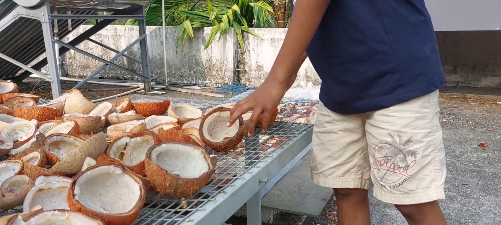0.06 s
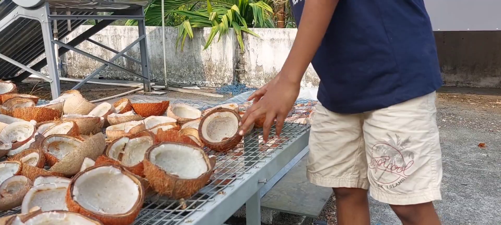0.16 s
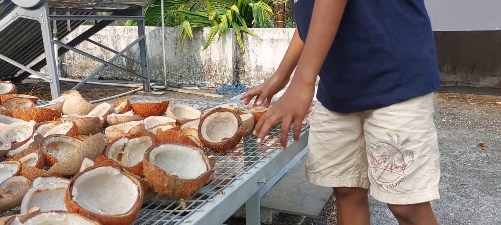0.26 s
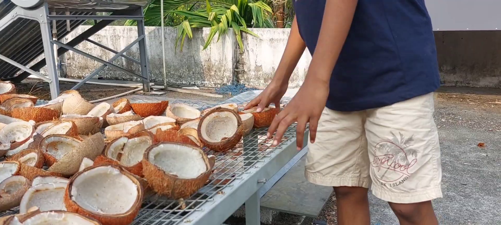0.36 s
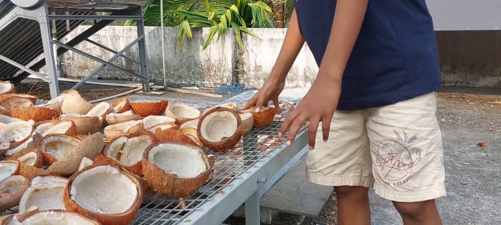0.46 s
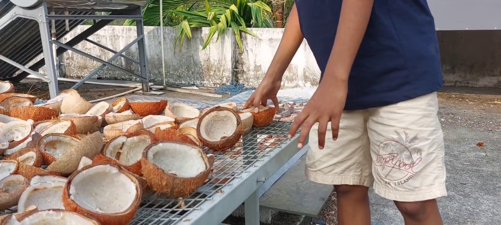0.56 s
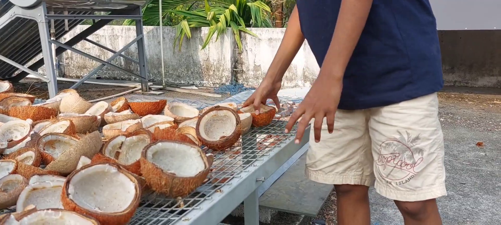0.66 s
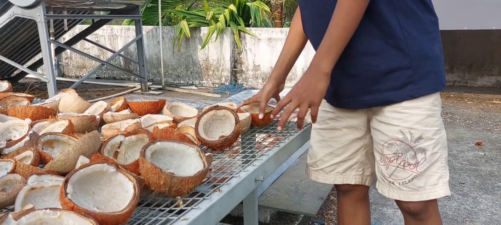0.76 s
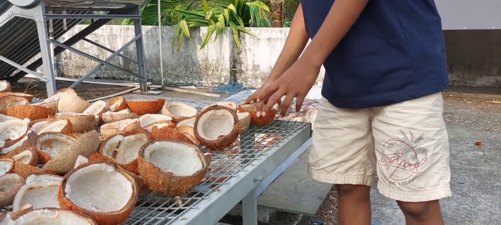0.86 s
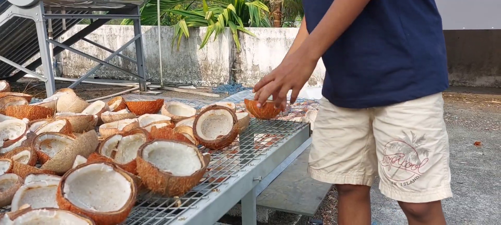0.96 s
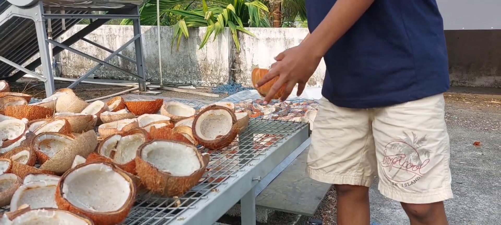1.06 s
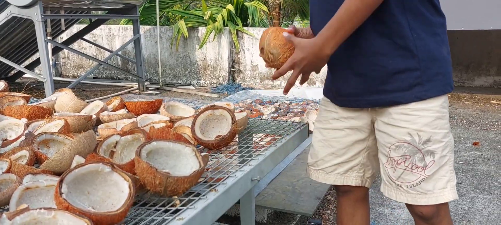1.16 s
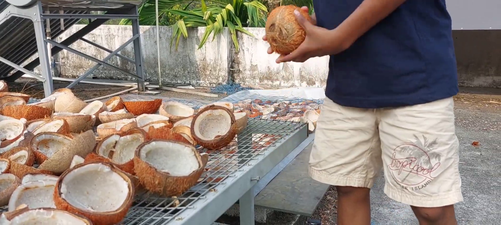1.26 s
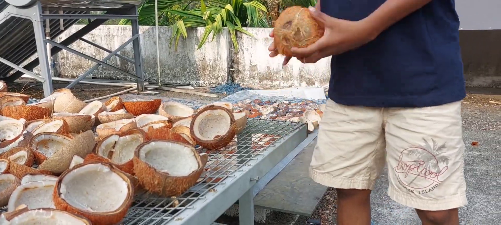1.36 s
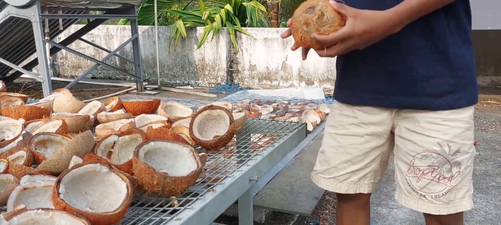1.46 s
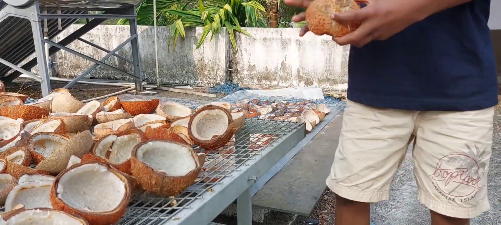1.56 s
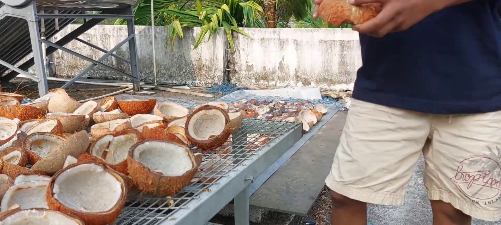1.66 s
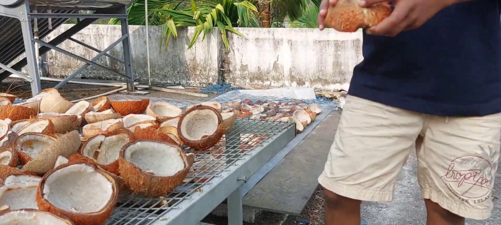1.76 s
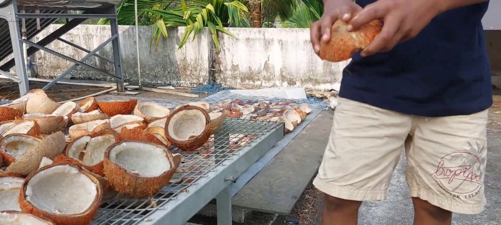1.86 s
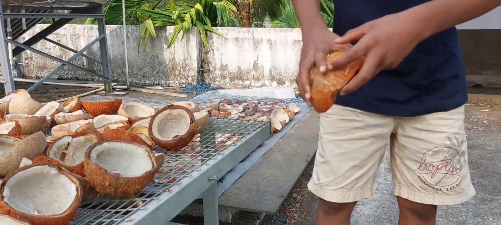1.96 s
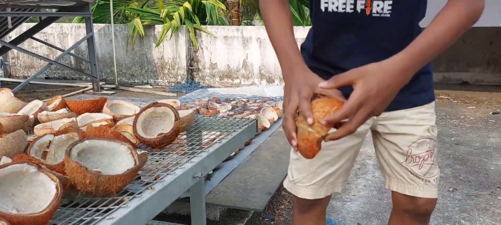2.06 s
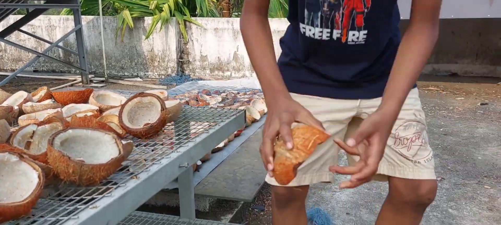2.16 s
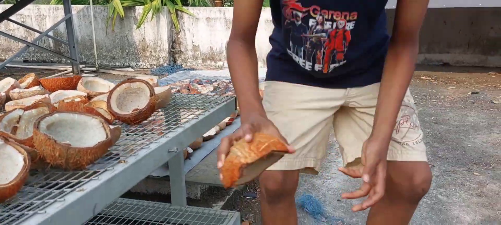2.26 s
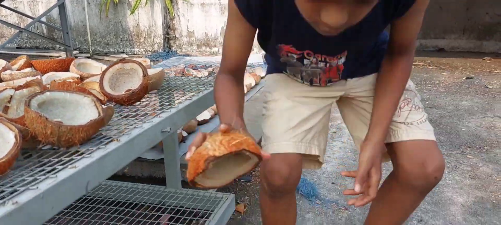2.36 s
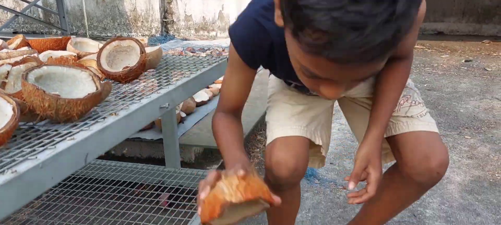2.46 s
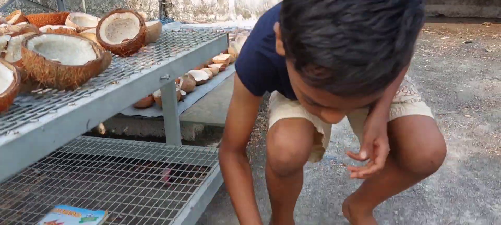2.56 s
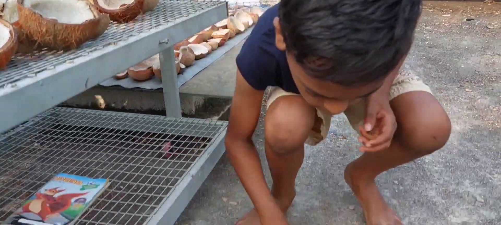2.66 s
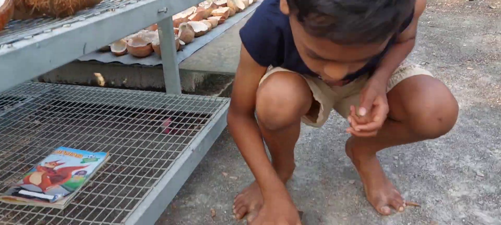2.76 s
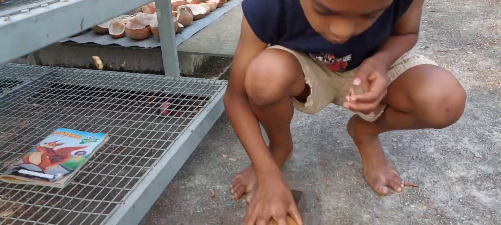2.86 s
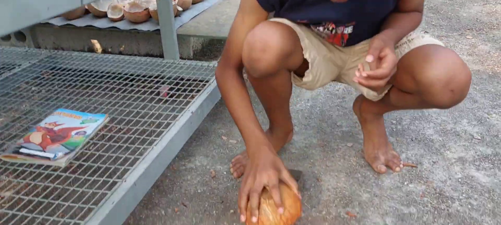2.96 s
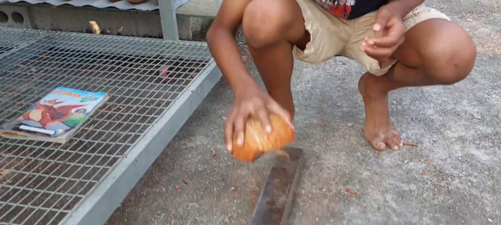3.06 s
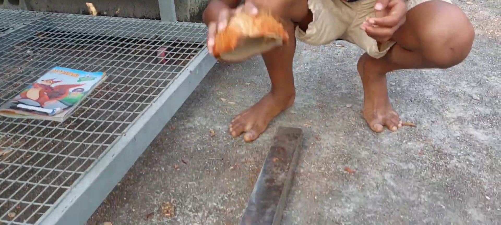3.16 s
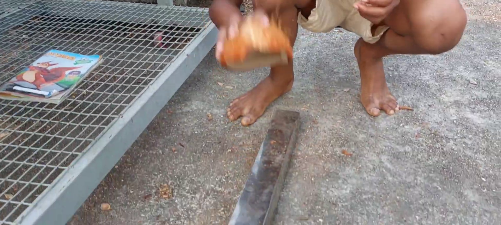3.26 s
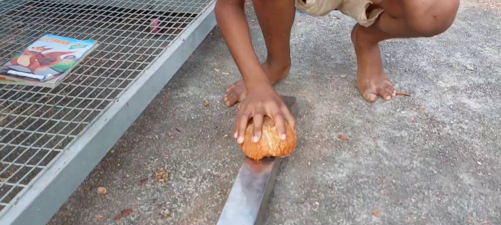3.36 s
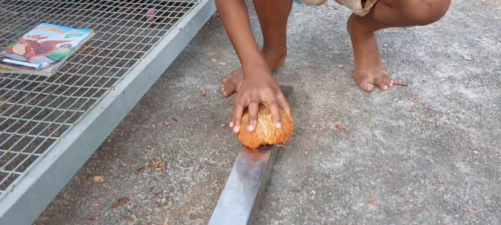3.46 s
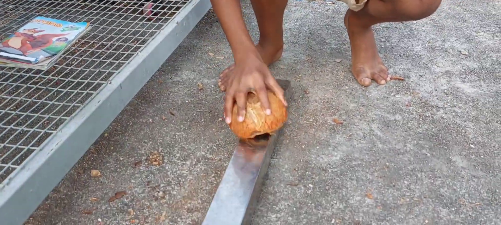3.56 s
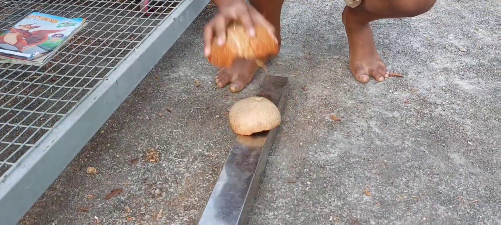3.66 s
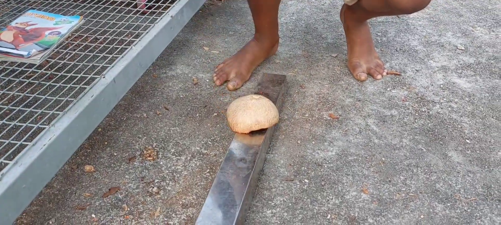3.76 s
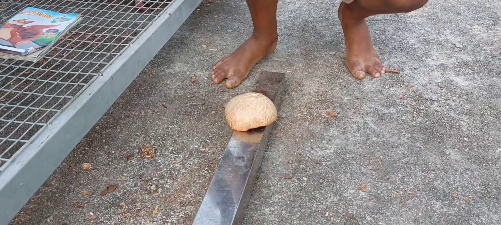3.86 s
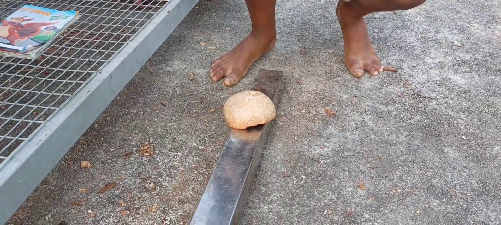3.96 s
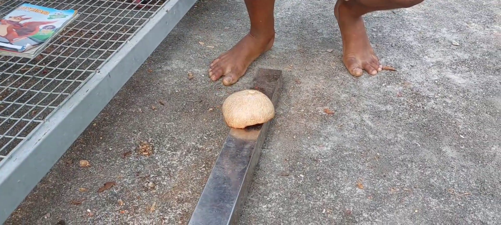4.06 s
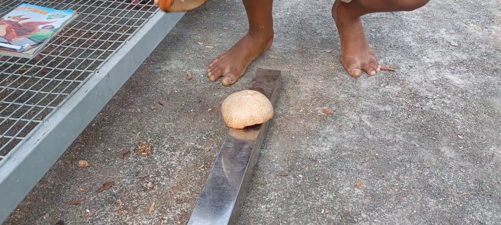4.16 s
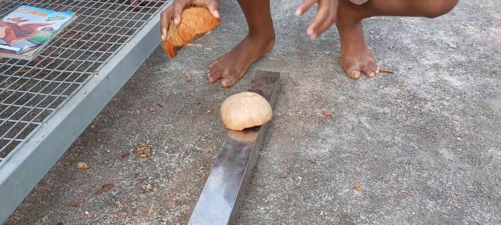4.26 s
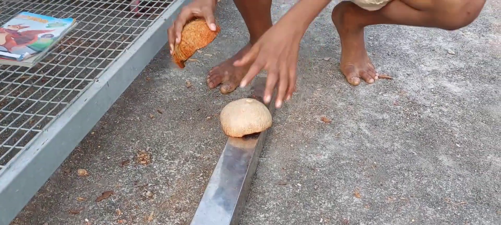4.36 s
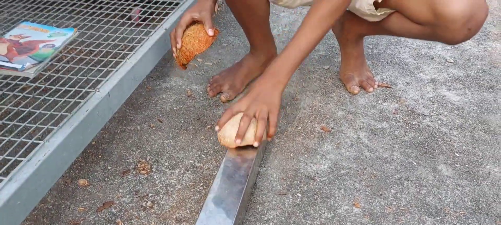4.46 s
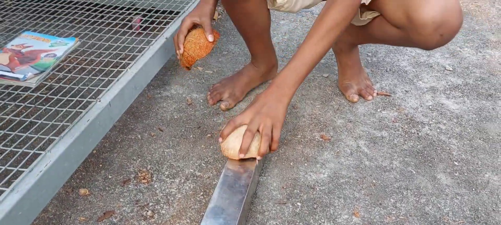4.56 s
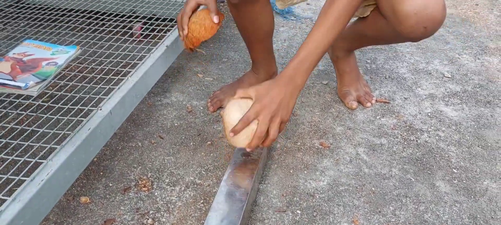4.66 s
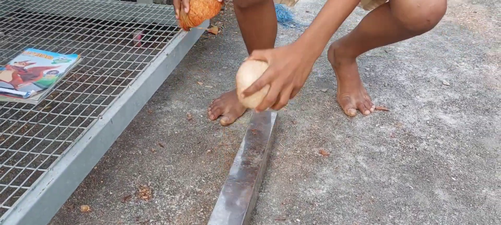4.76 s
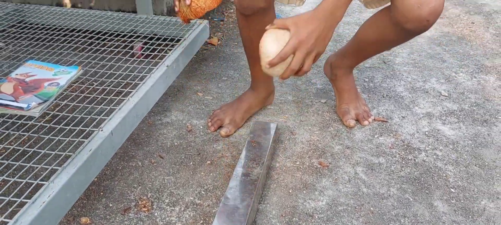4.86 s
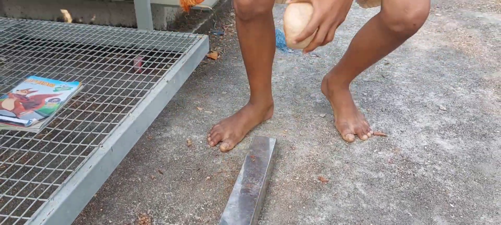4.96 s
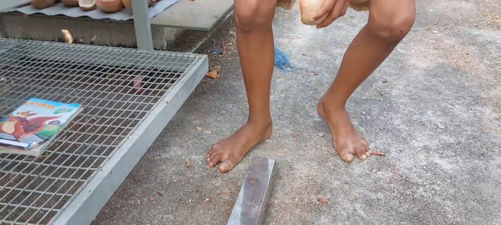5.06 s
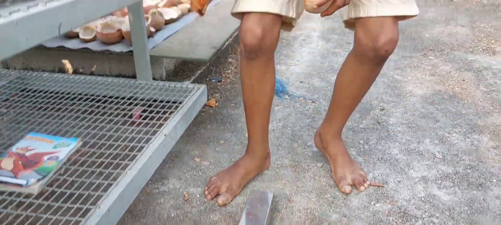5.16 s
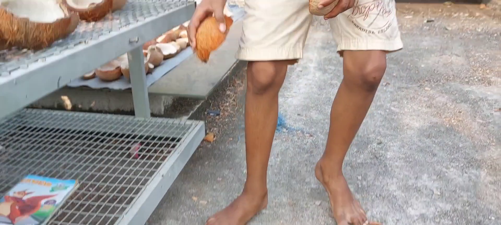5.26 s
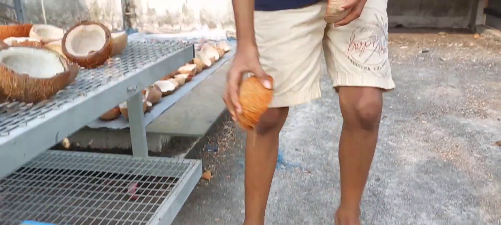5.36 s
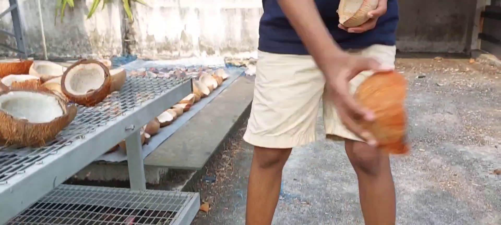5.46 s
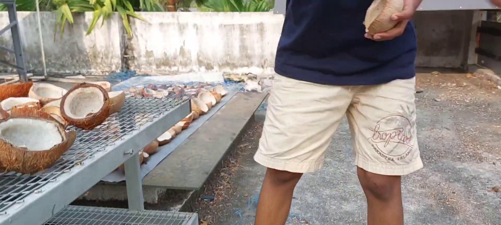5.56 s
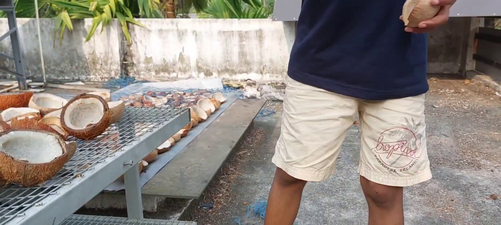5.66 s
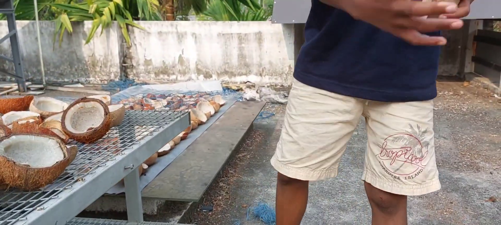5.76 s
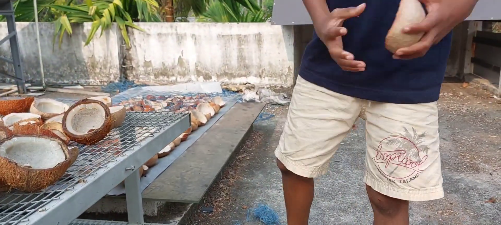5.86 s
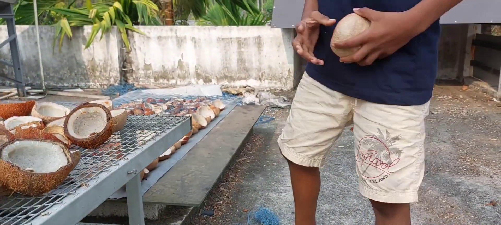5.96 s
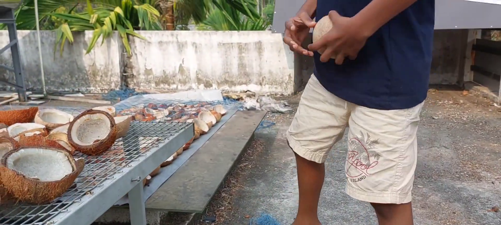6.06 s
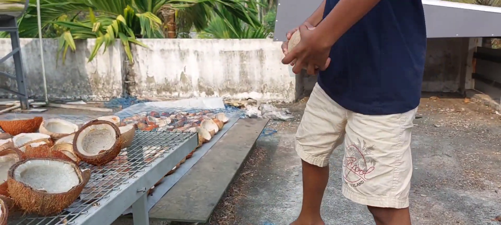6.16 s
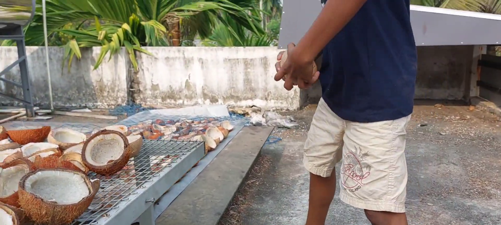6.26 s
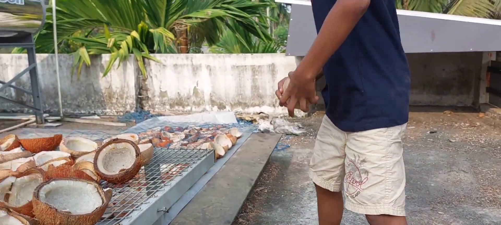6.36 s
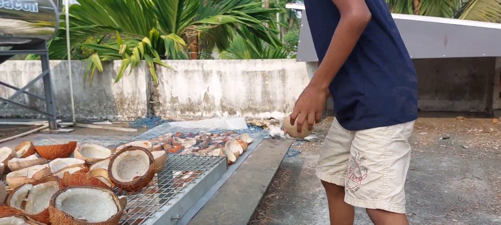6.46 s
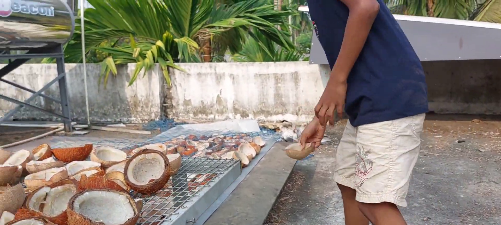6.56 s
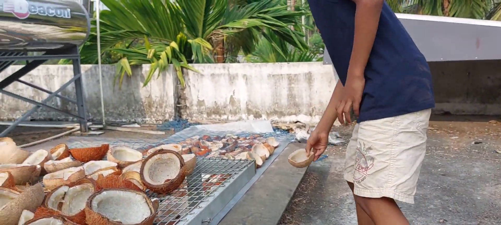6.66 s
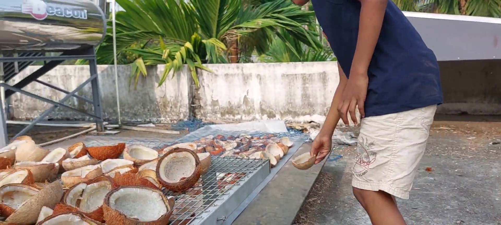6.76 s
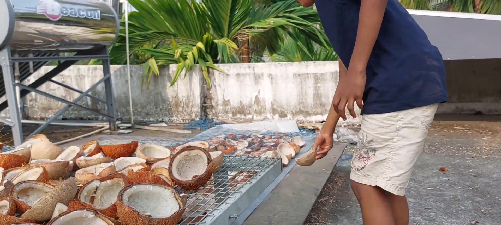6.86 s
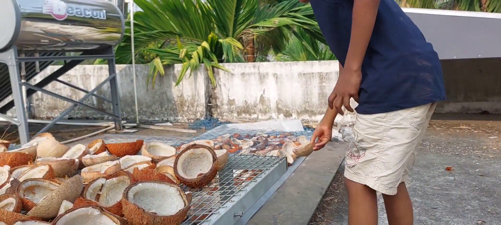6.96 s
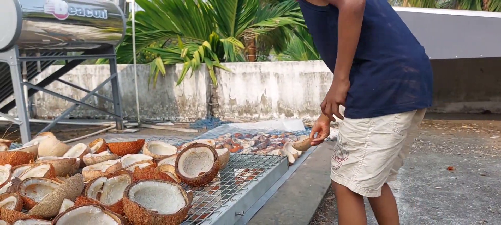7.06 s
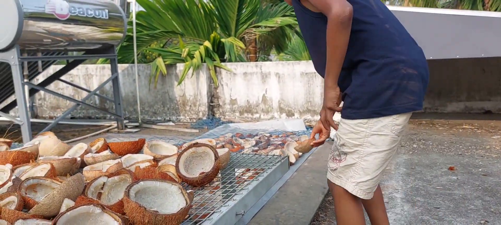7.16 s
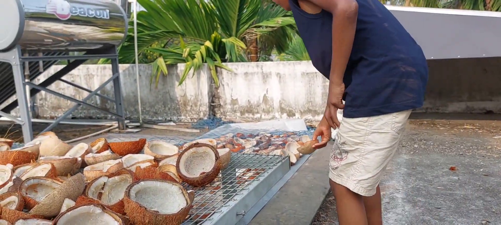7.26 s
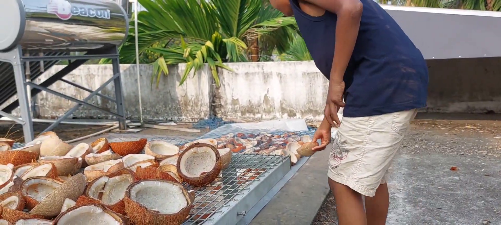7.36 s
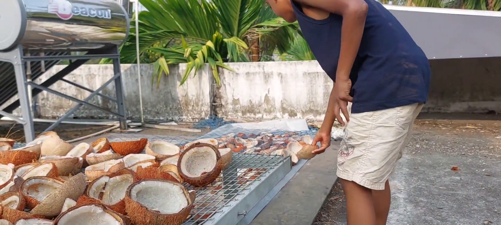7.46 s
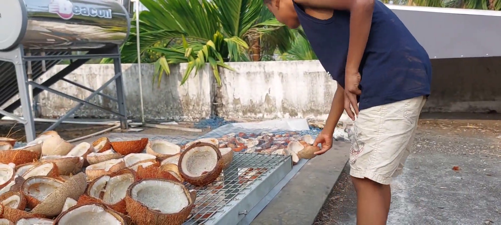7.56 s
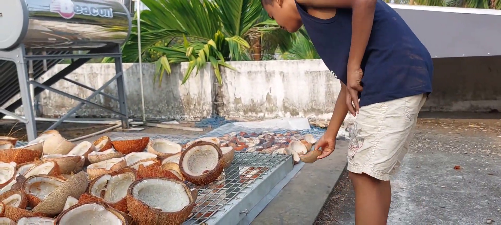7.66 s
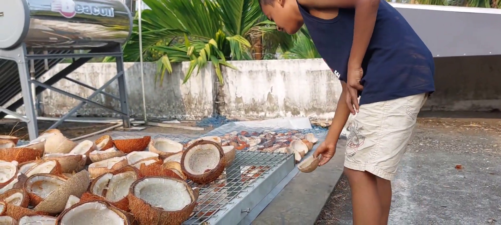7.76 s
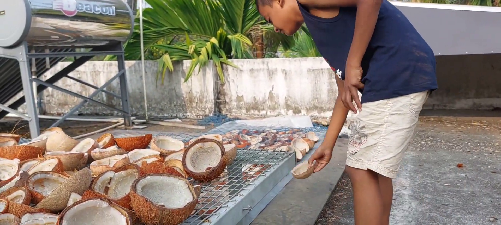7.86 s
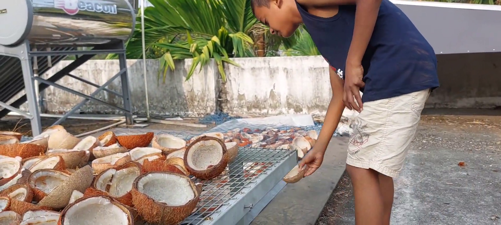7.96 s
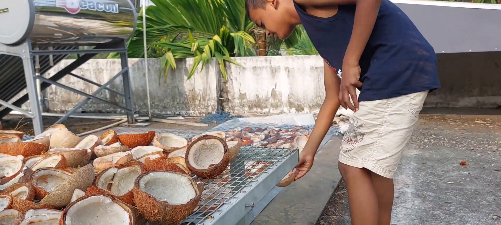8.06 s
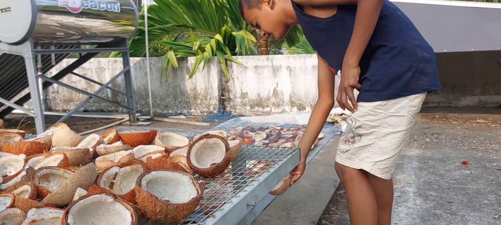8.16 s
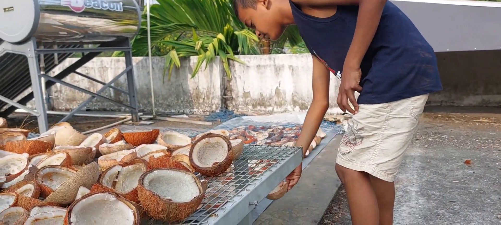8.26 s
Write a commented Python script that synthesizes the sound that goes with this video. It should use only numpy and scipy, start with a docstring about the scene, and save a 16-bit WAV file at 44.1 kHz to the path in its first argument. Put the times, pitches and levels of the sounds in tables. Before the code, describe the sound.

In an open yard with faint crows and a bird whistle, a coconut half smashes twice on steel, then its hollow shell knocks to rest.

```python
"""A low outdoor rumble, a soft hiss, a far rasp and crows open the scene; a bird whistles, whines drift by.
A coconut half is slammed twice on a steel blade on concrete: noise crunches, thuds and rattles over dying sines.
The loosened shell cracks down on the concrete and bounces to rest, its hollow modes ringing; brief dry scrapes
of rubbed husk and sliding shell, rasps and air are shaped noise, caws are harmonics, whistles gliding tones.
A gain control ducks everything at the slams, so the background sinks and then creeps back."""
import sys
import numpy as np
from scipy import signal
from scipy.fft import rfft, irfft, next_fast_len
from scipy.io import wavfile
from scipy.ndimage import uniform_filter1d, minimum_filter1d

SR = 44100
rng = np.random.default_rng(int(sys.argv[2]) if len(sys.argv) > 2 else 0)


def to_wav(s):
    """Save 16-bit WAV."""
    ch = np.atleast_2d(s).T  # columns
    pcm = np.round(np.clip(ch, -1, 1) * 32767)  # PCM
    wavfile.write(sys.argv[1], SR, pcm.astype(np.int16))


N = 366894
TIME = np.arange(N) / SR

# low outdoor rumble, also the colour of the slams' boom: [f/Hz, relative level per Hz/dB]
RUMBLE_COLOUR = [(15, -50), (25, -16), (67, 1.5), (87, 0), (147, -0.5), (184, -9), (267, -6), (310, -13),
                 (479, -20), (835, -24.5), (900, -30), (1170, -49), (1980, -120)]
# broadband crack of shell and grit: [f/Hz, relative level per Hz/dB]
CRUNCH_COLOUR = [(60, -11), (300, 0.5), (800, 3.5), (1800, 6), (4000, -2.5), (7000, -1.5), (10500, -7.5),
                 (15000, -9.5)]


def from_db(db):
    """Decibels to amplitude gain."""
    return 10 ** (np.asarray(db) / 20)


def rms_one(x):
    """Scale to unit power."""
    return x / np.sqrt(np.mean(x ** 2) + 1e-20)


def at_hz(points, hz, axis=1):
    """Read a column of a spectrum on a log-frequency axis."""
    table = np.array(points)
    return np.interp(np.log(hz + 1e-9), np.log(table[:, 0]), table[:, axis])


def add(out, s, sound):
    """Mix a sound in from time s on."""
    start = max(round(s * SR), 0)
    out[..., start:start + sound.shape[-1]] += sound[..., :N - start]


def low_pass(x, hz, order=2):
    """Causal Butterworth low-pass."""
    return signal.sosfilt(signal.butter(order, min(hz, SR / 2 - 1), fs=SR, output="sos"), x)


def noise(colour, size=N, alike=0.):
    """Stereo noise of unit power with a given spectrum and left-right likeness."""
    length = next_fast_len(size)
    hz = np.fft.rfftfreq(length, 1 / SR)
    if callable(colour):
        gain = colour(hz)
    else:
        # tabled colours also roll off below 30 Hz
        gain = from_db(at_hz(colour, hz)) * hz ** 2 / (hz ** 2 + 30 ** 2)
    white = rng.standard_normal((2, length))
    mid, side = irfft(rfft(white) * gain, length)[:, :size]
    alike = np.clip(alike, -1, 1)
    return rms_one(np.sqrt(1 + alike) * mid + np.sqrt(1 - alike) * side * [[1], [-1]])


def resonance(centre_hz, width_hz):
    """Gain against frequency of a steep-sided resonance."""
    return lambda hz: 1 / (1 + ((hz - centre_hz) / width_hz) ** 2)


def swell(t, length, rise):
    """Smooth rise, hold and fall."""
    return np.sin(np.pi / 2 * np.clip(np.minimum(t, length - t) / rise, 0, 1)) ** 2


def grainy(size, depth_db, count=40):
    """Random level of unit power, moving to a new value every count samples."""
    knots = rng.standard_normal(size // count + 2).clip(-2, 2)
    wander = np.interp(np.arange(size) / count, np.arange(len(knots)), knots)
    return rms_one(from_db(depth_db * wander))


def yard_echo(stretch=1.):
    """Scatter from walls and racks: noise bands of unit total energy a side, the treble dying first."""
    # echo of the yard: [f/Hz, relative level per Hz/dB, t60 before stretching/s]
    yard = [(80, -5, .35), (300, 0, .5), (900, 0, .5), (2200, -1, .5), (5000, -2, .48), (8000, -4, .4),
            (11000, -9, .3), (15000, -9, .27)]
    t, out = TIME[:SR], 0
    edges = np.geomspace(50, 17000, 15)
    for low, high in zip(edges, edges[1:]):
        hz = np.sqrt(low * high)
        band_filter = signal.butter(2, [low, high], "band", fs=SR, output="sos")
        band = signal.sosfilt(band_filter, rng.standard_normal((2, SR)))
        t60 = stretch * at_hz(yard, hz, axis=2)
        out = out + band * from_db(at_hz(yard, hz) - 60 * t / t60)
    return rms_one(out * (1 - np.exp(-t / 0.0028))) / np.sqrt(SR)


def in_yard(x, echo, wet_db):
    """A sound with its echo."""
    return x + from_db(wet_db) * signal.fftconvolve(np.atleast_2d(x), echo, axes=1)[:, :N]


def background():
    """Distant rumble and a soft hiss of foliage and insects: two noises whose levels drift."""
    # outdoor levels: [t/s, rumble level/dB, hiss level/dB]
    outdoors = [(0, -52.5, -56), (.6, -54, -63.5), (1.3, -48, -64), (1.801, -50.5, -60.5),
                (2.449, -48.5, -52), (3.2, -53, -53.5), (5.1, -54.5, -56), (6.4, -47.5, -63.5),
                (7.099, -54, -64.5), (7.5, -48.5, -63), (8.32, -47.5, -62)]
    # hiss of foliage and insects: [f/Hz, relative level per Hz/dB]
    air_colour = [(300, -11), (700, -3), (1700, 2.5), (2700, -14), (4500, -13.5), (5800, -17.5),
                  (6700, -9.5), (7800, -14.5), (15000, -20.5)]
    s, rumble_db, air_db = np.transpose(outdoors)
    rumble = noise(RUMBLE_COLOUR, alike=0.72) * from_db(np.interp(TIME, s, rumble_db))
    rumble *= grainy(N, depth_db=2.0, count=2000)
    air = noise(air_colour, alike=0.) * from_db(np.interp(TIME, s, air_db))
    return rumble + air


def scrapes_and_taps():
    """Brief dry scrapes and hisses (rubbed husk, sliding shell, a soft opening hiss) as grainy noise, and taps."""
    # brief dry scrapes and hisses: rubbed husk, the shell sliding on concrete, a soft opening hiss:
    # [t/s, length/s, level before the fade/dB]
    strokes = [(0, 0.25, -57.5), (0.268, 0.089, -60), (1.322, 0.29, -59.5), (1.731, 0.086, -52.5),
               (1.811, 0.089, -53.5), (1.963, 0.082, -38), (2.109, 0.13, -48), (2.267, 0.062, -52),
               (2.318, 0.072, -42), (2.403, 0.21, -60.5), (4.827, 0.093, -51.5), (5.312, 0.07, -50),
               (5.475, 0.14, -45.5), (5.72, 0.073, -45.5), (5.926, 0.039, -54.5), (6.108, 0.15, -40),
               (6.283, 0.15, -46), (6.4, 0.047, -37), (6.436, 0.14, -50.5), (6.6, .16, -50),
               (6.997, 0.18, -56), (7.387, 0.27, -61.5)]
    # small dry taps: [t/s, level/dB]
    dry_taps = [(.315, -50), (0.751, -48.5), (.94, -57), (1.98, -50), (2.01, -46), (2.353, -42.5),
                (3.074, -40), (3.88, -44.5), (5.591, -39), (6.935, -53)]
    # colour of the scrapes, hisses and taps: [f/Hz, relative level per Hz/dB]
    scrape_colour = [(500, -10), (1800, 2), (3500, -3), (5500, 1), (8000, 2), (11000, 2), (15500, 3)]
    rise_s, fade_db = 0.016, 8.5   # a stroke bites quickly, then fades evenly
    level, taps, t = np.zeros(N), np.zeros((2, N)), TIME[:SR // 4]
    for s, length, db in strokes:
        age = TIME[:int(length * SR)]
        add(level, s, swell(age, length, rise_s) * from_db(db - fade_db * age / length))
    for s, db in dry_taps:
        add(taps, s, noise(scrape_colour, len(t)) * from_db(db - 60 * t / 0.037))
    return taps + noise(scrape_colour) * grainy(N, depth_db=3.5, count=110) * level


def rasps(echo):
    """Distant toneless rasps, like a harsh bird's: fluttering noise in two resonances, plus hiss and echo."""
    # rasps before echo and panning: [t/s, length/s, shortest rise/s, lower resonance f/Hz, its level/dB,
    # upper resonance f/Hz, its level/dB, hiss level/dB]
    far_rasps = [(0, 0.16, 0.036, 4400, -56.5, 7840, -59.5, -60.5),
                 (4.245, 0.15, 0.038, 3730, -51.5, 4400, -48, -47.5),
                 (4.853, 0.4, 0.21, 2070, -57, 3100, -57, -74),
                 (7.588, 0.14, 0.059, 5860, -68, 6780, -59, -80),
                 (7.799, 0.62, 0.21, 2085, -38.5, 4710, -50, -48)]
    # hiss within a rasp: [f/Hz, relative level per Hz/dB]
    hiss_colour = [(500, -25), (1400, 12.5), (2400, 4), (3500, -69), (5500, -1.5), (7300, 2.5),
                   (10000, -8.5), (15000, -17.5)]
    out = np.zeros((2, N))
    for s, length, rise, lower_hz, lower_db, upper_hz, upper_db, hiss_db in far_rasps:
        t = TIME[:int(length * SR)]
        call = from_db(lower_db) * noise(resonance(lower_hz, width_hz=215), len(t))
        call += from_db(upper_db) * noise(resonance(upper_hz, width_hz=300), len(t))
        call += from_db(hiss_db) * noise(hiss_colour, len(t))
        flutter = grainy(len(t), depth_db=1.0, count=300)
        add(out, s, call * swell(t, length, max(rise, length / 4)) * flutter)
    # the left side is softer
    return in_yard(out, echo, wet_db=-5) * from_db([[-3.5], [-.5]])


def crows():
    """Hoarse arched caws: unsteady harmonics under one throat resonance."""
    # caws: [t/s, length/s, base pitch f/Hz, throat f/Hz, relative level/dB]
    caws = [(0.04, 0.28, 275, 1624, -54.5), (.68, .22, 300.6, 1440, -59.5), (1.139, .2, 347.8, 1654, -50.5),
            (1.8, 0.15, 418, 850, -64.5), (2.131, 0.38, 490, 1010, -58), (2.204, 0.33, 345, 2195, -54),
            (5.054, 0.27, 269.7, 1325, -66), (5.451, 0.15, 350, 1833, -60), (5.958, 0.17, 349, 1780, -63),
            (6.717, 0.26, 317.6, 1595, -55.5), (7.251, 0.27, 314.5, 1632, -58.5),
            (7.54, 0.16, 349, 1695, -59)]
    out = np.zeros(N)
    for s, length, pitch_hz, throat_hz, db in caws:
        t = TIME[:int(length * SR)]
        jitter = rms_one(low_pass(rng.standard_normal(len(t)), 120))
        # the pitch rises, then ends below its start
        arch = np.sin(np.pi * t / length) - t / length
        pitch = pitch_hz * (1 + 0.09 * arch + 0.033 * jitter)
        phase = 2 * np.pi * np.cumsum(pitch) / SR
        throat = resonance(throat_hz, width_hz=180)
        voice = sum(throat(k * pitch) * np.sin(k * phase) for k in range(1, 11))
        add(out, s, rms_one(voice) * swell(t, length, rise=0.045) * from_db(db))
    return out


def tone(pitch, waver, waver_hz):
    """A nearly pure tone whose pitch wavers at random by a given share."""
    unsteady = 1 + waver * rms_one(low_pass(rng.standard_normal(len(pitch)), waver_hz))
    return np.sin(2 * np.pi * np.cumsum(pitch * unsteady) / SR)


def whistles():
    """A bird's notes: each holds its top pitch, then slurs down, fluttering in level."""
    # notes before echo: [t/s, length/s, hold/s, top f/Hz, f the slur heads for/Hz, relative level/dB,
    # fade over a full slur/dB, waver as a share of pitch]
    notes = [(1.225, 0.086, 0.0063, 3070, 2250, -66.5, -17, .01),
             (1.625, 0.12, 0.016, 3640, 2650, -58.5, -5, .035),
             (2.094, .12, 0.042, 3383, 1550, -44, 14, .01), (2.46, .11, 0.055, 3314, 1600, -45, 9.5, .01)]
    slur_s, rise_s = 0.017, 0.016   # time constant of the falling pitch; rise of a note
    out = np.zeros(N)
    for s, length, hold, top_hz, bottom_hz, db, fade_db, waver in notes:
        t = TIME[:int(length * SR)]
        slur = 1 - np.exp(-np.maximum(t - hold, 0) / slur_s)
        note = tone(top_hz + (bottom_hz - top_hz) * slur, waver, waver_hz=200)
        flutter = grainy(len(t), depth_db=3.5, count=300)
        add(out, s, note * flutter * swell(t, length, rise_s) * from_db(db - fade_db * slur))
    return out


def whines():
    """Faint whines, like passing motors: tones that swell and fade while the pitch sinks evenly."""
    # whines: [t/s, length/s, first f/Hz, last f/Hz, relative level/dB]
    far_whines = [(2.402, 3.19, 790.8, 784.4, -53), (3.498, 2.4, 1475, 1184, -55.5),
                  (3.601, 2.2, 2164, 1803, -49)]
    out = np.zeros(N)
    for s, length, first_hz, last_hz, db in far_whines:
        t = TIME[:int(length * SR)]
        whine = tone(first_hz + (last_hz - first_hz) * t / length, waver=.005, waver_hz=25)
        add(out, s, whine * swell(t, length, rise=1.3) * from_db(db))
    return out


def mode(hz, db, t60, spread, beat_db=0):
    """A dying sine, a phase apart left to right, whose level may beat slowly."""
    t = TIME[:int(min(2 * t60, 3) * SR)]
    phase = rng.uniform(0, 2 * np.pi) + spread * np.array([[.5], [-.5]])
    beat = beat_db * np.sin(2 * np.pi * (rng.uniform(3.8, 11) * t + rng.random()))
    return np.sin(2 * np.pi * hz * t + phase) * from_db(db + beat - 60 * t / t60)


def slams(count=70):
    """The shell crunches on the steel, the ground thuds, and the blade rings according to where it is hit."""
    # slams on the blade: [t/s, blade relative level/dB, dense overtones relative level/dB,
    # crack relative level/dB, time for the crack to lose 20 dB/s, thud relative level/dB,
    # rattle relative level/dB, left lead of the crack/ms]
    blows = [(2.6146, 0.5, -28, -11, 0.024, -23.5, -10, .25), (3.3580, 0, -27, -3.5, 0.046, -17, -15, .5)]
    # strong modes of the blade: [f/Hz, t60/s, relative level struck at the first spot/dB,
    # relative level at the second spot/dB, left-right phase/rad]
    blade = [(1001, 0.35, -26, -36, -0.1), (1102, 0.7, -28, -25, -0.2), (1545, 0.3, -24, -17, 0.8),
             (1650, 0.3, -9, -27, 0.8), (1700, 0.3, -16, -23, 1.2), (1857, 0.38, -10, -20, 0.1),
             (1902, 0.3, -8, -20, 1.0), (1952, 0.36, -5, -24, 0.4), (2132, 0.3, -14, -17, -0.2),
             (2217, 0.42, -18, -9, 1.4), (2240, 0.33, -12, -15, 0.8), (2273, 0.3, -16, -11, 1.4),
             (2383, 0.58, -19, -16, 0.6), (2536, 1.6, -21, -26, -2.0), (2700, 0.4, -19, -23, 1.5),
             (2803, 0.3, -22, -32, -0.1), (2875, 1, -34, -25, 2.4), (3278, 0.9, -29, -34, 0.7),
             (3483, 0.5, -24, -31, 1.3), (3741, 0.95, -25, -25, -2.1), (3941, 0.35, -28, -26, 2.3),
             (4243, 1, -46, -38, 0.5), (4861, 0.5, -33, -34, -0.2), (5028, 0.33, -25, -37, 0.4),
             (5351, 0.3, -27, -35, -0.5), (5577, 0.3, -30, -28, -0.1), (5830, 0.55, -42, -34, 0.3),
             (7372, 0.3, -26, -27, -1.4)]
    # many weaker overtones of the blade: [f/Hz, relative level/dB, t60/s]
    overtones = [(500, -17, .35), (1200, -11, .33), (2000, -3, .38), (3000, -2, .36), (4200, -8, .4),
                 (5400, -5, .38), (8000, -8, .3), (11000, -14, .23), (15000, -12, .2)]
    # deep thud of the ground: [f/Hz, relative level per Hz/dB]
    thud_colour = [(25, -6), (60, 2.5), (130, -2), (300, -5.5), (600, -20.5), (2000, -38)]
    # shell buzzing against the steel: [f/Hz, relative level per Hz/dB]
    rattle_colour = [(200, -32.5), (900, -17.5), (1400, -15.5), (1750, 4), (2300, -3), (2900, 1.5),
                     (3600, -19.5), (5200, -18.5), (8000, -27), (12000, -38.5)]
    boom_db, boom_t60_s = -26.5, 1.1   # the thud lingers between the walls; level relative to the thud
    out, t = np.zeros((2, N)), TIME[:3 * SR]
    short = t[:SR]
    lowest_hz, highest_hz = overtones[0][0], overtones[-1][0]
    for spot, (s, blade_db, dense_db, crack_db, crunch_s, thud_db, rattle_db, lead_ms) in enumerate(blows):
        ring = np.zeros((2, len(t)))
        for hz, t60, first_db, second_db, spread in blade:
            spot_db = (first_db, second_db)[spot]
            add(ring, 0, mode(hz, blade_db + spot_db, t60, spread, beat_db=4.0))
        # one weak overtone falls somewhere in each narrow slice of the spectrum, more densely towards the top
        place = ((np.arange(count) + rng.random(count)) / count) ** .7
        for hz in lowest_hz * (highest_hz / lowest_hz) ** place:
            db = dense_db + at_hz(overtones, hz) + rng.normal(0, 3.4)
            add(ring, 0, mode(hz, db, at_hz(overtones, hz, axis=2), rng.normal(0, 1.2)))
        # the shell pressed on the steel holds the ring back at first
        ring *= from_db(-9 * np.exp(-t / 0.014)) * (1 - np.exp(-t / 0.00029))
        crack = noise(CRUNCH_COLOUR, SR, alike=0.34) * grainy(SR, depth_db=0.5)
        crack *= from_db(crack_db - 20 * short / crunch_s)
        thud = noise(thud_colour, SR, alike=.05) * from_db(thud_db - 60 * short / 0.11)
        thud *= 1 - np.exp(-short / .001)
        boom = noise(RUMBLE_COLOUR, SR, alike=0.45) * from_db(thud_db + boom_db - 60 * short / boom_t60_s)
        rattle = noise(rattle_colour, SR, alike=.4) * from_db(rattle_db - 60 * short / .42)
        # a new blow stops what still rang
        out *= np.exp(-np.clip(TIME - s, 0, .5) / .01)
        add(out, s, ring)
        add(out, s, thud + boom + rattle)
        add(out[0], s, crack[0])
        add(out[1], s + lead_ms / 1000, crack[1])
    return out


def knocks():
    """Each knock on concrete rings the hollow shell, dulled by soft contact, and adds a burst of grit noise."""
    # knocks before echo: [t/s, shell relative level/dB, contact cut-off f/Hz, grit level before panning/dB,
    # left-right difference/dB]
    shell_knocks = [(2.924, -22, 2473, -36, -2), (6.0941, -4, 6060, -3, -2.5), (6.101, -31, 3030, -32, -17),
                    (6.111, -19, 2500, -17, -8), (6.12, -23, 4000, -15.5, 4.5),
                    (6.1608, -17.5, 1980, -18.5, 0), (6.2619, -15.5, 1840, -28, -3.5),
                    (6.276, -68, 3000, -43, -23), (6.325, -50, 5960, -44, -22),
                    (6.342, -55, 9050, -34.5, 0), (6.417, -46, 6000, -40.5, -5),
                    (6.522, -23.5, 1003, -36.5, -4), (6.548, -26, 1290, -29.5, -4),
                    (6.574, -26.5, 1010, -41, -10), (6.585, -38, 1000, -39, 3),
                    (6.599, -5.5, 1080, -25, -2), (6.639, -36, 1180, -36, -11)]
    # modes of the hollow shell, before random spread: [f/Hz, relative level/dB, t60/s]
    shell = [(240, -14, .09), (540, -8, .035), (850, 5, .03), (1250, -5, .03), (1500, -5, .025),
             (1880, 2.5, .03), (2560, -2, .025), (3150, -3, .02), (5200, -3, .025), (7600, -9, .015)]
    out, t = np.zeros((2, N)), TIME[:SR // 4]
    for s, level_db, contact_hz, grit_db, pan_db in shell_knocks:
        knock = noise(CRUNCH_COLOUR, len(t)) * from_db(grit_db - 60 * t / 0.044)
        for hz, mode_db, t60 in shell:
            # a soft contact reaches only the low modes
            contact_loss_db = 10 * np.log10(1 + (hz / contact_hz) ** 6)
            strength_db = level_db + mode_db + rng.normal(0, 2) - contact_loss_db - 8.5
            add(knock, 0, mode(hz * rng.normal(1, 0.032), strength_db, t60, rng.normal(0.91, 0.68)))
        pan = from_db(np.array([[.5], [-.5]]) * pan_db)
        add(out, s, knock * (1 - np.exp(-t / 0.00019)) * pan)
    return out


def gain_control(x):
    """The gain drops at once by whatever exceeds the limit, stays down for a while, then creeps back."""
    limit_db, window_s, hold_s, release_db_per_s = -6.5, 0.016, 1.167, 25.5
    power = uniform_filter1d(np.mean(x ** 2, axis=0), int(window_s * SR))
    over_db = np.maximum(10 * np.log10(np.abs(power) + 1e-12) - limit_db, 0)
    hold = int(hold_s * SR)
    # running maximum over the hold time
    held_db = -minimum_filter1d(-over_db, hold, origin=(hold - 1) // 2, mode="nearest")
    recovery_db = release_db_per_s * TIME
    return x * from_db(recovery_db - np.maximum.accumulate(held_db + recovery_db))


def scene():
    """The open air, far birds and whines, and the near scrapes, taps and blows."""
    far_echo = yard_echo(stretch=1.2)
    caws = from_db(-4.5) * in_yard(crows(), far_echo, wet_db=-1.0)
    song = whistles()
    # the bird sits to the left and reaches that side first
    song = np.array([song, np.interp(TIME - .00034, TIME, song)])
    birds = caws + in_yard(song, yard_echo(stretch=.9), wet_db=-4.0)
    whine = from_db(-7) * in_yard(whines(), far_echo, wet_db=-1.5)
    bounces = in_yard(knocks(), yard_echo(stretch=0.53), wet_db=-10.5)
    blows = from_db(14.5) * slams() + bounces
    return background() + scrapes_and_taps() + rasps(far_echo) + birds + whine + blows


def record(dry):
    """The slams duck the gain, peaks are softly rounded off, and a steep filter cuts the top."""
    cutoff_hz = 16200
    ducked = gain_control(dry)
    rounded = ducked / (1 + np.abs(ducked / .95) ** 4) ** (1 / 4)
    return signal.sosfilt(signal.ellip(10, .2, 80, cutoff_hz, fs=SR, output="sos"), rounded)


dry = scene()
out = record(dry)
to_wav(out)
```